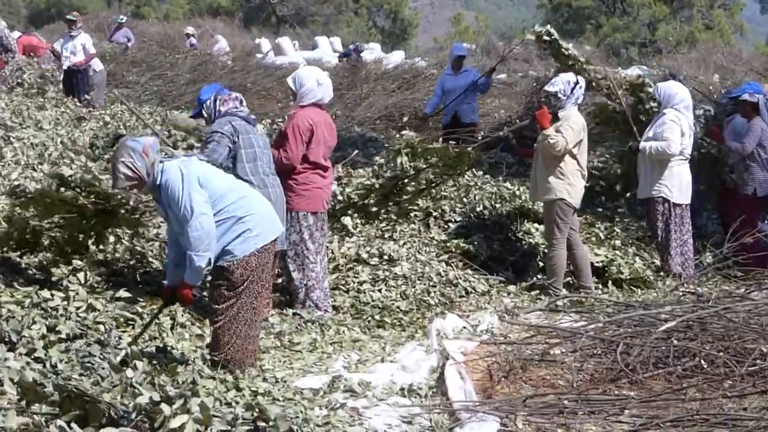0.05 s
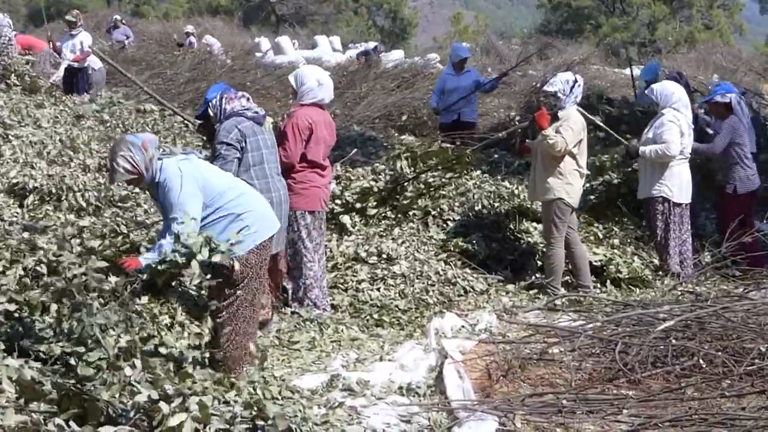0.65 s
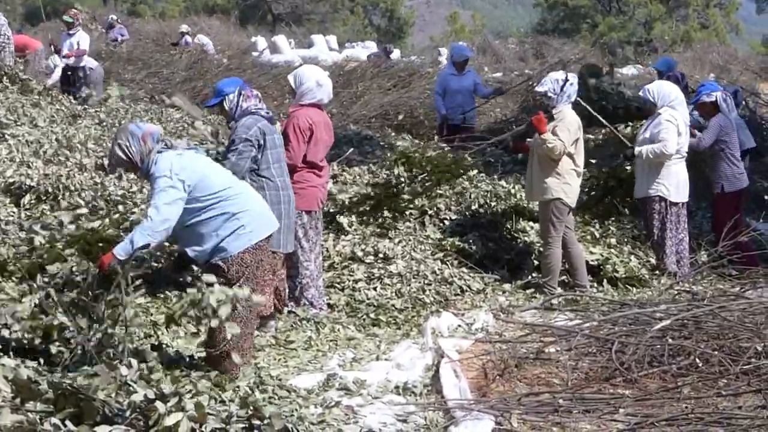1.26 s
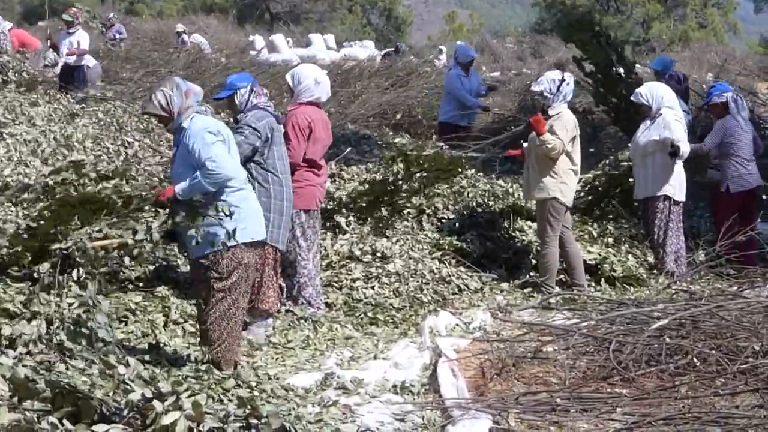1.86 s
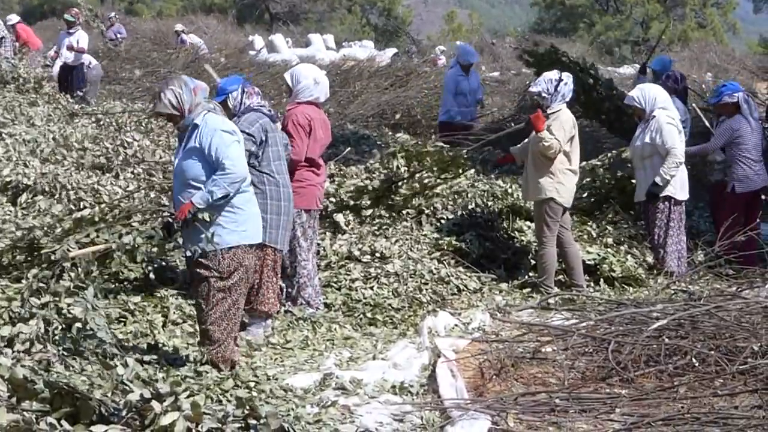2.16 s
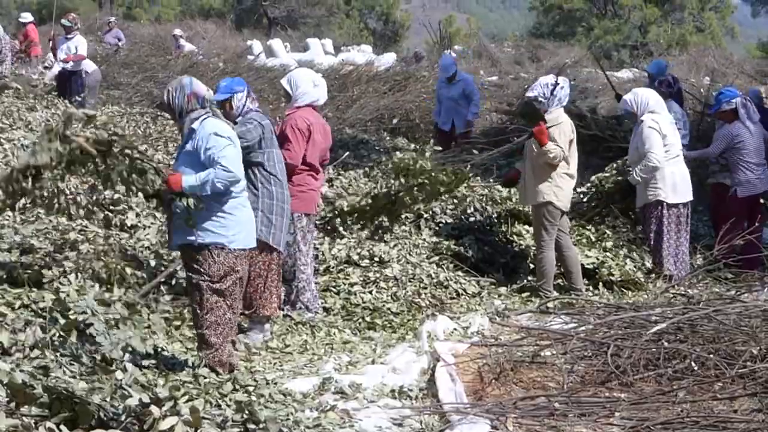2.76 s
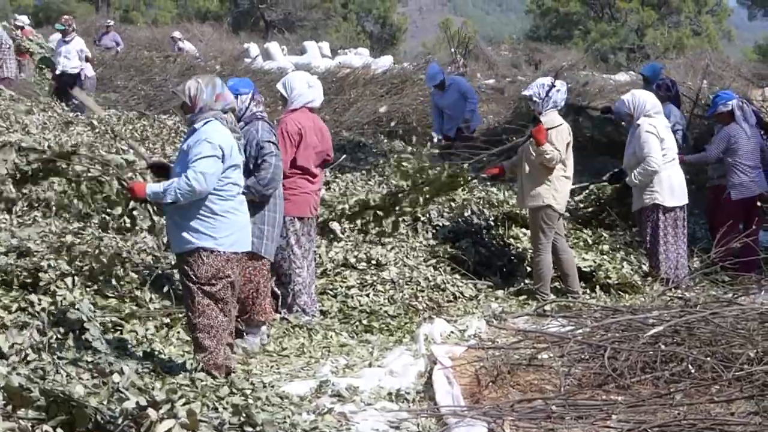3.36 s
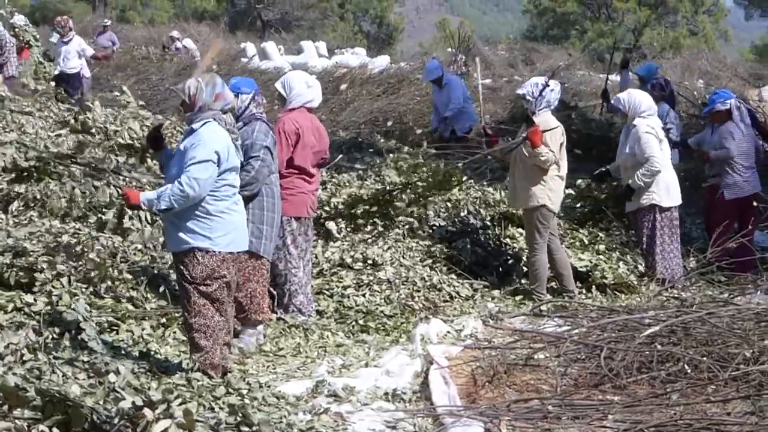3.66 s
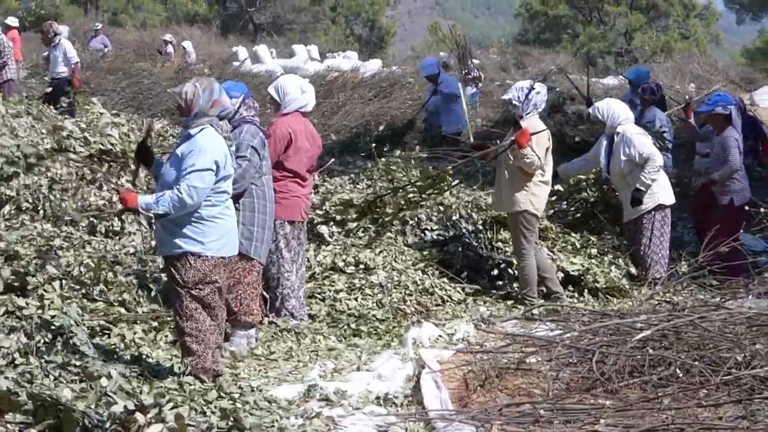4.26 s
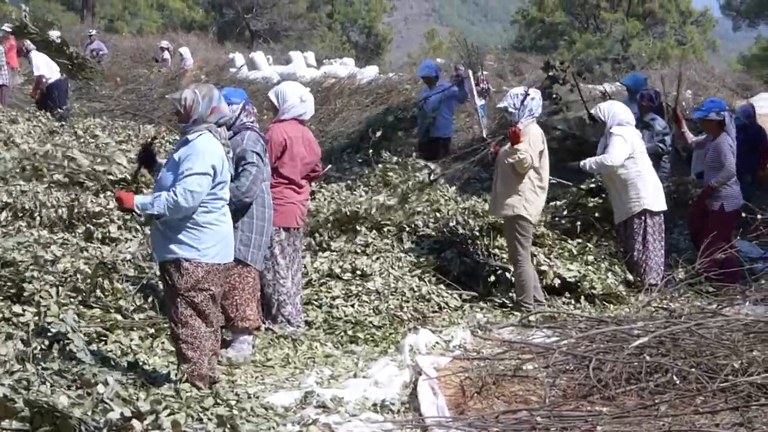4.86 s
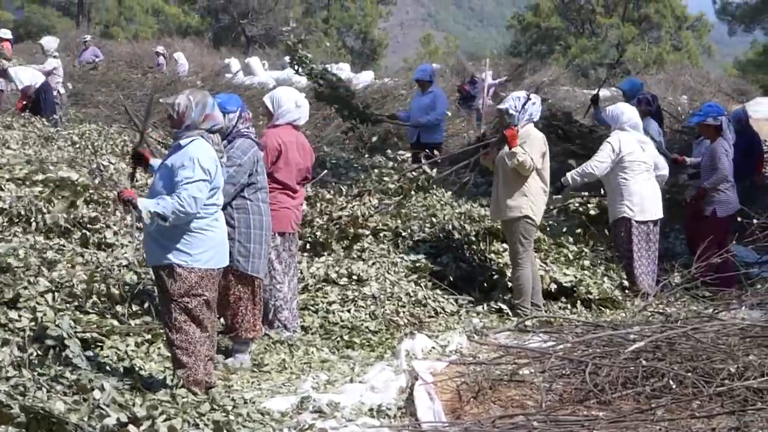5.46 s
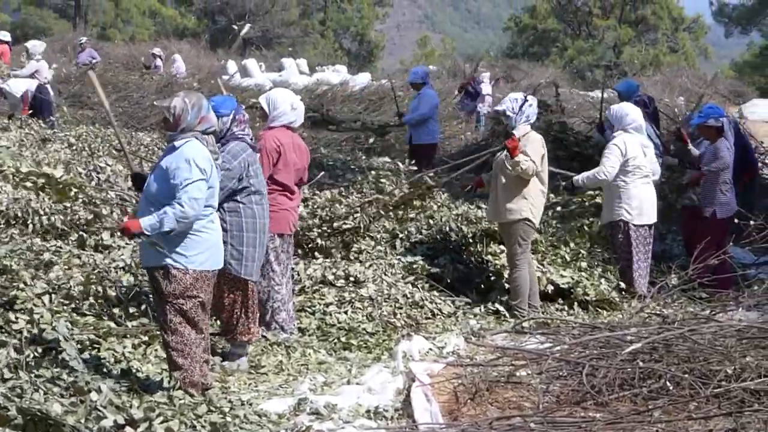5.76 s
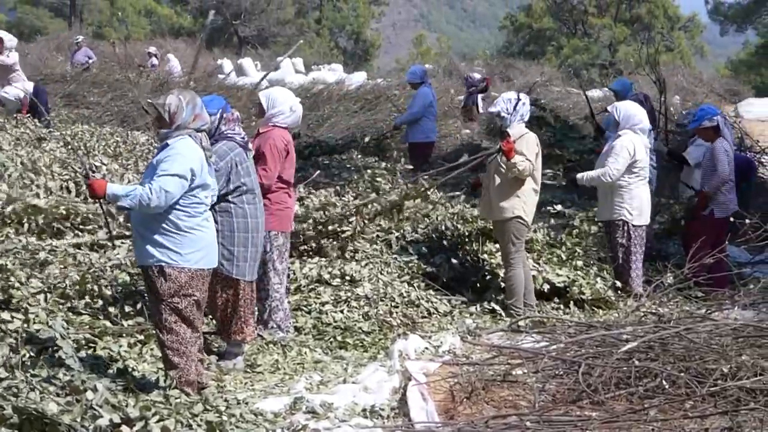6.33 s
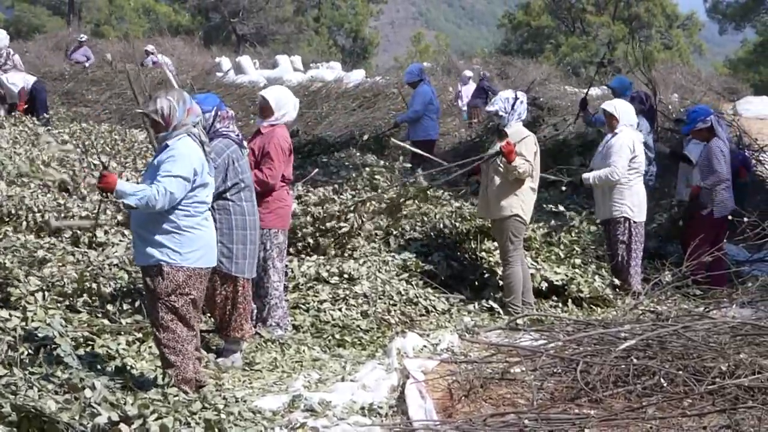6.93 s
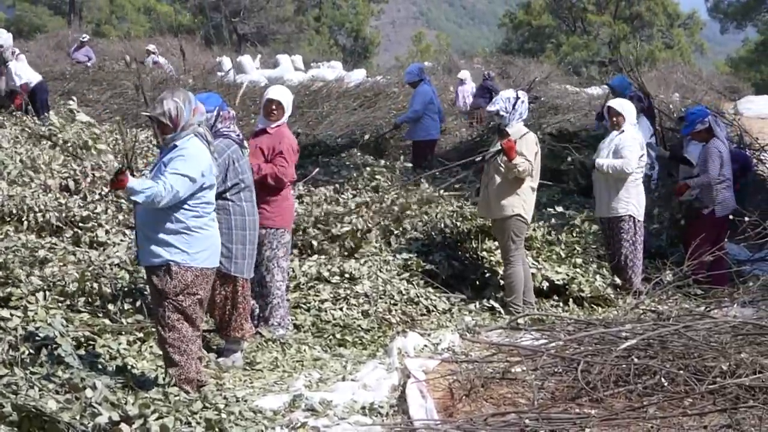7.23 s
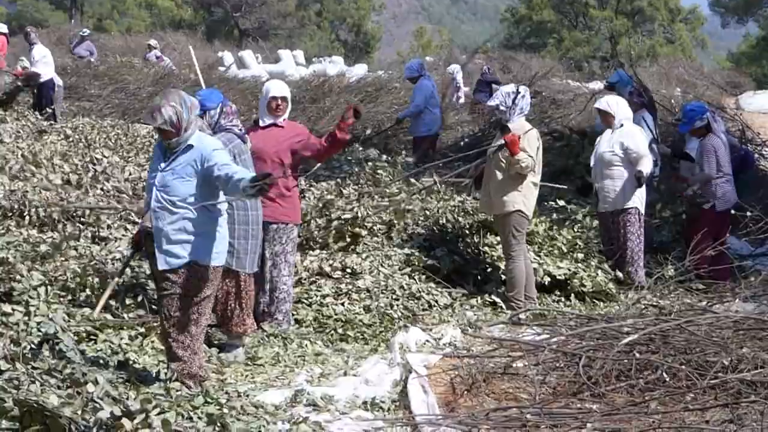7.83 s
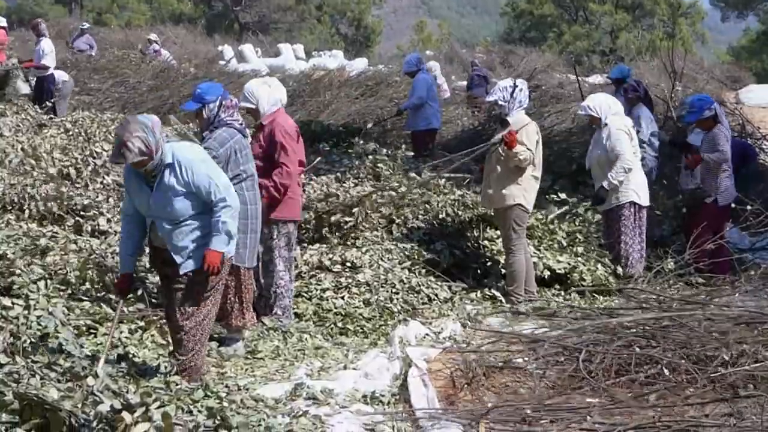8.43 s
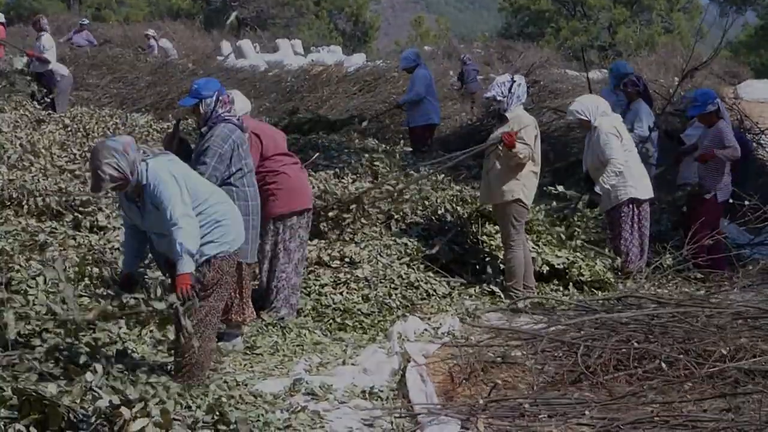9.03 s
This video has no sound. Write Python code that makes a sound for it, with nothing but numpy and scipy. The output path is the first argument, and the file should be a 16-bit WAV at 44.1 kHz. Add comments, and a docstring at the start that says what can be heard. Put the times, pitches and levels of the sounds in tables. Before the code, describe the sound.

Dense, uneven stick strikes snap twigs and shake dry leaves in an open field, over a faint background hiss.

```python
"""Dry branches rustle in an open field; workers beat the leaves off the heaps with sticks.
Each stroke snaps a cluster of twigs, thuds into the heap and sets off a dying shower of crisp leaves.
Some strike bare wood, which clacks and rings briefly. Single twigs snap, puffs of air brush the
microphone and a low hum hangs in the distance."""
import sys
import numpy as np
from scipy import signal
from scipy.fft import rfft, irfft, next_fast_len
from scipy.io import wavfile

SR = 44100
rng = np.random.default_rng(int(sys.argv[2]) if len(sys.argv) > 2 else 0)


def materialize(psi):
    """Save the field psi as 16-bit PCM at rate SR to the path in sys.argv[1].

    A 1-D psi becomes a single channel; in a 2-D psi each row is a channel.
    """
    bounded = np.clip(np.atleast_2d(psi).T, -1, 1)
    quanta = np.round(bounded * 32767).astype(np.int16)
    wavfile.write(sys.argv[1], SR, quanta)


N = 400861
TIME_S = np.arange(N) / SR
AGE_S = TIME_S[:SR // 2]   # time axis of one event

# branches dragged and turned: t/s, level/dB
RUSTLE_LEVELS = [(0.0, -36.5), (0.15, -36.5), (0.42, -39), (0.58, -35), (0.72, -43), (1.25, -42),
                 (1.55, -35), (2.0, -42.5), (2.75, -35), (3.25, -44.5), (5.15, -42), (5.55, -46),
                 (6.65, -47.5), (7.2, -42.5), (7.4, -41.5), (8.17, -50.5), (8.35, -34.5), (8.85, -47.5),
                 (9.09, -58)]
# dry leaf spectrum: f/Hz, level/dB
LEAF_SPECTRUM = [(150, -3.5), (380, -6.5), (650, 1.5), (900, 1), (1200, 1.5), (2000, -4), (2800, -4.5),
                 (6300, -2.5), (8000, -7.5), (10000, -2), (12500, -12), (15500, -22.5)]
# open-field noise spectrum: f/Hz, level/dB
FIELD_SPECTRUM = [(25, -30), (60, -32), (120, -6), (380, -4), (650, 1), (900, -1.5), (1200, -0.5),
                  (2000, -6), (6000, -12), (15000, -75)]
# distant tones: f/Hz, level/dB
HUM_TONES = [(90, -67.5), (134, -62), (260, -69)]
# stick strokes: t/s, crack level/dB, leaf shower level/dB, thud level/dB
STICK_STROKES = [(0.1, -39, -36.5, -61), (0.2095, -22.5, -31.5, -27), (0.7478, -29.5, -34, -37),
                 (0.8583, -26, -32, -32), (0.946, -23, -32, -41.5), (1.037, -46, -34, -44),
                 (1.404, -30.5, -28.5, -30.5), (1.5025, -34, -40, -33), (1.64, -27, -36.5, -34),
                 (1.785, -28, -32, -32.5), (1.892, -35, -33, -38), (2.0483, -32, -34.5, -38),
                 (2.258, -35, -43, -40), (2.292, -26, -54, -39), (2.361, -34.5, -41, -38.5),
                 (2.67, -22, -28, -27.5), (2.802, -45, -32, -43), (2.89, -30, -31, -37),
                 (3.286, -35, -38.5, -33), (3.385, -57, -37, -42), (3.425, -22.5, -27.5, -28),
                 (3.782, -36, -54, -39), (3.8702, -14.5, -29, -26), (3.994, -28, -32, -37.5),
                 (4.155, -25, -33.5, -32.5), (4.4577, -19.5, -27, -25.5), (4.5125, -26, -29, -31),
                 (4.8532, -27.5, -36.5, -33), (5.025, -33.5, -44, -41), (5.0707, -19.5, -34.5, -33.5),
                 (5.228, -31, -32, -35), (5.252, -24, -60, -52), (5.651, -24, -33, -31),
                 (5.757, -22, -28.5, -31), (6.0543, -17, -29, -24.5), (6.203, -35, -38, -37.5),
                 (6.286, -38, -36, -41), (6.32, -18, -33.5, -33.5), (6.429, -30.5, -43, -40.5),
                 (6.479, -44, -39.5, -40.5), (6.701, -22.5, -30, -28.5), (6.8312, -22.5, -31, -43),
                 (6.995, -30, -33.5, -31.5), (7.042, -30, -49, -38.5), (7.324, -20.5, -34, -32.5),
                 (7.490, -42, -31.5, -34.5), (7.847, -22.5, -34.5, -34), (7.896, -26, -31.5, -34.5),
                 (7.987, -33.5, -32, -36.5), (8.014, -35, -35.5, -47), (8.451, -24.5, -34.5, -32),
                 (8.482, -25, -52, -37), (8.5801, -22, -35.5, -31.5), (8.712, -35.5, -40.5, -46),
                 (8.9925, -26.5, -35.5, -34)]
# breaking twig spectrum: f/Hz, level/dB
CRACK_SPECTRUM = [(200, -64), (700, -9), (1600, -0.5), (4200, 0), (6300, 0.5), (8000, -4.5), (10000, 1.5),
                  (12500, -8.5), (15500, -21.5)]
# struck heap spectrum: f/Hz, level/dB
THUD_SPECTRUM = [(150, -39), (650, 5), (900, 1), (1200, 6.5), (1450, -6), (1750, 4.5), (2100, -39),
                 (5000, -21)]
# single twigs snapping: t/s, level/dB
TWIG_SNAPS = [(0.316, -31), (1.107, -32), (1.632, -28), (1.802, -25.5), (2.21, -29), (2.524, -27.5),
              (2.61, -28.5), (2.893, -21.5), (3.42, -24), (3.439, -21.5), (4.021, -27), (6.066, -20),
              (6.088, -26), (6.294, -31), (6.482, -29), (7.845, -30), (8.3105, -28), (9.023, -29)]
# hits on bare wood, thick boughs low, thin twigs high: t/s, level/dB, resonance f/Hz
WOOD_HITS = [(0.212, -24.5, 9600), (1.786, -32, 2540), (3.025, -35, 1430), (3.427, -38, 1660),
             (3.871, -31, 3730), (4.459, -25.5, 5200), (4.513, -27, 3300), (4.574, -39, 1280),
             (5.0738, -21.5, 9200), (5.231, -34, 3660), (5.757, -32, 3100), (6.055, -35, 1980),
             (6.32, -34, 3540), (6.701, -27.5, 3680), (6.833, -33.5, 3130), (6.892, -37, 1620),
             (7.324, -28.5, 1700), (7.85, -30, 2800), (7.902, -32, 2130), (8.452, -30.5, 2550),
             (8.491, -32, 1170), (8.583, -29, 3780), (8.994, -31, 3170)]
# modes of a struck branch: ratio to its resonance, level/dB
WOOD_MODES = [(0.73, -4.5), (1.0, 3.5), (1.33, -3.5)]
# air puffs on the microphone: peak t/s, level/dB
AIR_PUFFS = [(0.764, -41), (0.805, -39.5), (0.935, -45), (1.645, -34), (1.75, -47), (2.314, -41.5),
             (2.479, -26), (2.53, -45), (2.57, -30.5), (2.812, -38), (2.85, -45), (2.94, -43), (3.08, -46),
             (3.19, -47)]
# right microphone port against left: f/Hz, level/dB, lag/rad, coherence
PORT_RESPONSE = [(226, -10.5, 0.5, 0.88), (404, -10, 0.5, 0.096), (516, -17.5, -2, 1), (843, -6, -3, 0.93),
                 (1110, -4.5, -2.5, 0.99), (1890, 0.24, -2.5, 1), (4570, -1, -1.67, 0.3),
                 (8100, -1, -0.94, 0.65), (14300, -5.5, -1, 0.44)]


def from_db(db):
    """Decibels to gain."""
    return 10 ** (np.asarray(db) / 20)


def noise():
    """Two unrelated noises: direct and scattered sound."""
    return rng.standard_normal((2, N))


def bandpass(x, band_hz, order=2):
    """Butterworth band-pass."""
    return signal.sosfilt(signal.butter(order, band_hz, "band", fs=SR, output="sos"), x)


def at_bins(rows, size):
    """Columns of a frequency table at the FFT bins."""
    hz, *columns = np.transpose(rows)
    bins_hz = np.maximum(np.arange(size // 2 + 1) * SR / size, 1)
    return [np.interp(np.log(bins_hz), np.log(hz), column) for column in columns]


def coloured(x, spectrum, tilt_db_oct=0):
    """Apply a tilted spectrum; rms 1."""
    size = next_fast_len(N)
    gain_db = at_bins(spectrum, size)[0] + tilt_db_oct * np.log2(np.arange(size // 2 + 1) + 1)
    shaped = irfft(rfft(x, size) * from_db(gain_db), size)[:, :N]
    return shaped / np.sqrt(np.mean(shaped ** 2) + 1e-20)


def add(out, start_s, sound):
    """Mix in one event."""
    at = round(start_s * SR)
    out[..., at:at + len(AGE_S)] += sound[..., :N - at]


def envelope(bursts):
    """Power sum of unrelated bursts (t/s, shape)."""
    power = np.zeros(N)
    for start_s, shape in bursts:
        add(power, start_s, shape ** 2)
    return np.sqrt(power)


def band_burst(shape, hiss, hz, edge_ratio):
    """Noise burst around hz, with the energy of its shape."""
    burst = bandpass(shape * hiss, [hz / edge_ratio, hz * edge_ratio])
    return burst * np.linalg.norm(shape) / np.linalg.norm(burst, axis=1, keepdims=True)


def impulses(per_s, spread_db):
    """Kicks at random moments; the spread makes a few large."""
    born = rng.random(N) < per_s / SR
    return born * from_db(spread_db * np.minimum(rng.exponential(1, N), 4))


def leaf_ticks(per_s, spread_db, tick_s, edges_hz=(100, 2500, 5500, 9000, 17000)):
    """Dry leaves tick at random, each a tiny burst in the band of its leaf."""
    kicks = impulses(per_s, spread_db)
    hiss = noise(), noise()
    band_of_kick = rng.integers(0, len(edges_hz) - 1, N)
    decay = np.exp(-2 / (tick_s * SR))
    out = np.zeros((2, N))
    for k, band_hz in enumerate(zip(edges_hz, edges_hz[1:])):
        power = signal.lfilter([1], [1, -decay], kicks ** 2 * (band_of_kick == k) + 1e-18)
        out += bandpass(np.sqrt(power) * hiss[k % 2], band_hz)
    return out


def heap_rustle(gain_db=-1.4):
    """Leaves brush each other as branches are dragged and turned."""
    ticks = leaf_ticks(per_s=6000, spread_db=0, tick_s=0.0033)
    level_db = np.interp(TIME_S, *np.transpose(RUSTLE_LEVELS)) + gain_db
    return from_db(level_db) * coloured(ticks, LEAF_SPECTRUM, tilt_db_oct=0.43)


def field_noise(level_db=-45):
    """Steady background of the open field."""
    return from_db(level_db) * coloured(noise(), FIELD_SPECTRUM)


def distant_hum(waver_hz=1.36):
    """Low, slowly wavering tones, as of a far engine."""
    out = np.zeros((2, N))
    knots_s = np.arange(0, 10, 0.25)
    for hz, db in HUM_TONES:
        pitch_hz = hz + waver_hz * np.interp(TIME_S, knots_s, rng.standard_normal(len(knots_s)))
        out[0] += from_db(db) * np.sqrt(2) * np.sin(2 * np.pi * np.cumsum(pitch_hz) / SR)
    return out


def blow(rise_s, steepness=0.46):
    """Force of a stick: peaks at rise_s, then lets go."""
    u = np.minimum(AGE_S / rise_s, 20)
    return (u * np.exp(1 - u)) ** steepness


def stroke_rise_s(t_s, crack_db, wood_s=0.0017, sink_s=0.0048, firm_db=-24.5, halving_db=41):
    """Bare wood stops the stick fast; in leaves, harder strokes peak sooner."""
    on_wood = any(abs(t_s - hit_s) < 0.004 for hit_s, _, _ in WOOD_HITS)
    return wood_s if on_wood else sink_s * 2 ** ((firm_db - crack_db) / halving_db)


def cracks(even_lead_db=10, echo_gain=0.52, echo_s=0.0012, gain_db=-1):
    """Twig clusters break; strokes that thud little stay in the leaves and are brighter."""
    woody, leafy = (
        coloured(impulses(per_s=16000, spread_db=3) * noise(), CRACK_SPECTRUM, tilt_db_oct)
        for tilt_db_oct in (-1, 4))
    out = np.zeros((2, N))
    for t_s, crack_db, _, thud_db in STICK_STROKES:
        pick, path = rng.random(2)
        part = int(pick * (N - len(AGE_S))) + np.arange(len(AGE_S))
        leafy_share = 1 / (1 + from_db(thud_db - crack_db + even_lead_db) ** 2)
        fractures = np.sqrt(1 - leafy_share) * woody[:, part] + np.sqrt(leafy_share) * leafy[:, part]
        force = from_db(crack_db + gain_db) * blow(stroke_rise_s(t_s, crack_db))
        crack = force * fractures / np.sqrt(1 + echo_gain ** 2)
        add(out, t_s, crack)
        # ground bounce: each path gives its own pitched bands
        add(out, t_s + echo_s * (0.5 + path) / 2, echo_gain * crack)
    return out


def thuds(give_s=0.0012):
    """The springy heap gives way a little more slowly, hollow and woody."""
    force = envelope((t_s, from_db(thud_db) * blow(stroke_rise_s(t_s, crack_db) + give_s))
                     for t_s, crack_db, _, thud_db in STICK_STROKES)
    return force * coloured(noise(), THUD_SPECTRUM)


def settling(crack_db, shower_db, rise_s=0.002, fall_s=0.081, crack_lead_db=20, doubling_db=23):
    """Swell and fall of one shower; soft landings, more leaves than crack, swell later."""
    swell_s = rise_s * 2 ** ((shower_db - crack_db + crack_lead_db) / doubling_db)
    shape = (1 - np.exp(-AGE_S / swell_s)) * np.exp(-AGE_S / fall_s)
    return from_db(shower_db) * shape / shape.max()


def leaf_showers(fresh_s=0.095, fresh_db_oct=2, late_db_oct=1.5):
    """Shaken leaves tick together, crisp at first, duller as they settle."""
    fresh = np.exp(-(AGE_S / fresh_s) ** 2)
    out = np.zeros((2, N))
    for share, tilt_db_oct in (fresh, fresh_db_oct), (1 - fresh, late_db_oct):
        shower = envelope((t_s, settling(crack_db, shower_db) * np.sqrt(share))
                          for t_s, crack_db, shower_db, _ in STICK_STROKES)
        ticks = leaf_ticks(per_s=7000, spread_db=1.5, tick_s=0.0016)
        out += shower * coloured(ticks, LEAF_SPECTRUM, tilt_db_oct)
    return out


def whips_and_twigs(whip_delay_s=0.002, whip_db=-3.5, gain_db=-1):
    """Dry snaps: each stick tip whips down just after its shaft; single twigs give way."""
    whips = [(t_s + whip_delay_s, from_db(crack_db + whip_db) * blow(rise_s=0.00068))
             for t_s, crack_db, _, _ in STICK_STROKES]
    twigs = [(t_s, from_db(db) * blow(rise_s=0.0014)) for t_s, db in TWIG_SNAPS]
    hiss = coloured(noise(), CRACK_SPECTRUM, tilt_db_oct=-0.5)
    return from_db(gain_db) * envelope(whips + twigs) * hiss


def wood_clacks(rise_s=0.0021, gain_db=0.5):
    """The stick chatters on a bare branch, whose damped resonance colours the clack."""
    out = np.zeros((2, N))
    for t_s, db, hz in WOOD_HITS:
        chatter = rng.standard_normal((2, len(AGE_S)))
        clack = band_burst(blow(rise_s), chatter, hz, edge_ratio=1.22)
        add(out, t_s, from_db(db + gain_db) * clack)
    return out


def branch_rings(swell_cycles=2.1, delay_s=0.001195, bark_hz=4100, unevenness=0.95, gain_db=8.5):
    """Each struck branch rings a few cycles at its own mode spacing; bark cushions high modes."""
    out = np.zeros((2, N))
    for t_s, db, hz in WOOD_HITS:
        for ratio, mode_db in WOOD_MODES:
            mode_hz = hz * ratio ** (1 + unevenness * (rng.random() - 0.5))
            tone = np.sin(2 * np.pi * (mode_hz * AGE_S + rng.random((2, 1))))
            ring = blow(swell_cycles / mode_hz, steepness=0.94) * tone
            cushion = 1 / np.sqrt(1 + (mode_hz / bark_hz) ** 20)
            add(out, t_s + delay_s, from_db(db + mode_db + gain_db) * cushion * ring)
    return out


def air_puffs(strong_db=-27.5, strong_hz=179, strong_half_s=0.01, octave_db=35, doubling_db=12):
    """Eddies bump the microphone; strong ones pass quickly, weak ones linger and are lower."""
    out, air = np.zeros((2, N)), noise()
    middle_s = AGE_S[-1] / 2
    for peak_s, db in AIR_PUFFS:
        hz = strong_hz * 2 ** ((db - strong_db) / octave_db)
        half_s = strong_half_s * 2 ** ((strong_db - db) / doubling_db)
        speed = from_db(db) * np.exp(-np.minimum(((AGE_S - middle_s) / half_s) ** 2, 20))
        start_s = peak_s - middle_s
        at = round(start_s * SR)
        add(out, start_s, band_burst(speed, air[:, at:at + len(AGE_S)], hz, edge_ratio=1.465))
    return bandpass(out, band_hz=(70, 390), order=4)


def microphone(x):
    """Close ports, widened: near antiphase in the midrange, less alike in the treble."""
    size = next_fast_len(N)
    right_db, lag_rad, coherence = at_bins(PORT_RESPONSE, size)
    coherence = np.clip(coherence, 0, 1)
    direct, scattered = rfft(x, size)
    shared = coherence * np.exp(-1j * lag_rad) * direct
    right = from_db(right_db) * (shared + np.sqrt(1 - coherence ** 2) * scattered)
    return np.array([x[0], irfft(right, size)[:N]])


def scene():
    """Field, beating, rustle and air, in stereo."""
    background = field_noise() + distant_hum()
    beating = cracks() + thuds() + wood_clacks() + branch_rings() + whips_and_twigs() + leaf_showers()
    return microphone(background + beating + heap_rustle() + air_puffs())


def record(dry):
    """Steep low-pass at 16 kHz."""
    return signal.sosfilt(signal.ellip(10, 0.2, 80, 16000, fs=SR, output="sos"), dry)


dry = scene()
out = record(dry)
materialize(out)
```